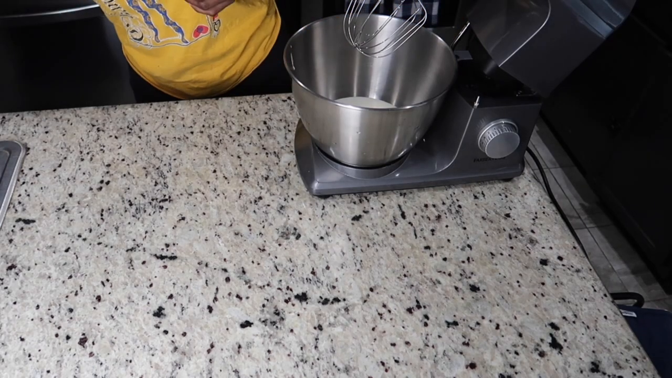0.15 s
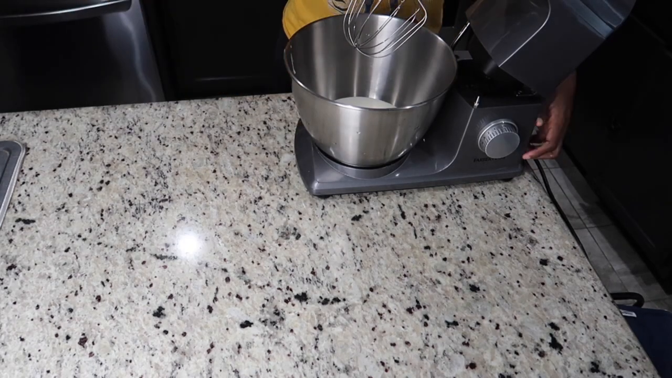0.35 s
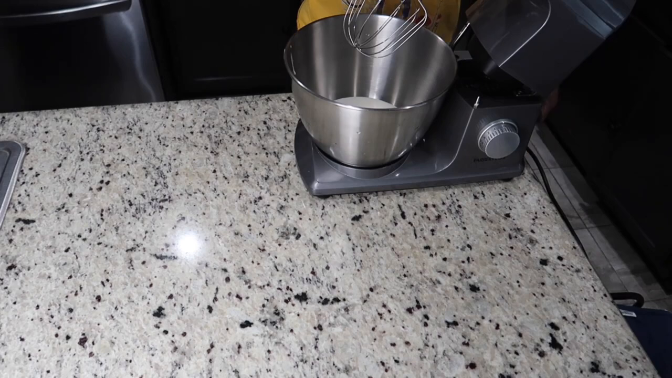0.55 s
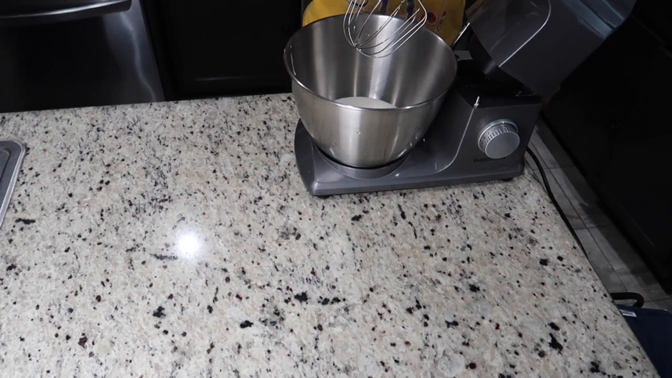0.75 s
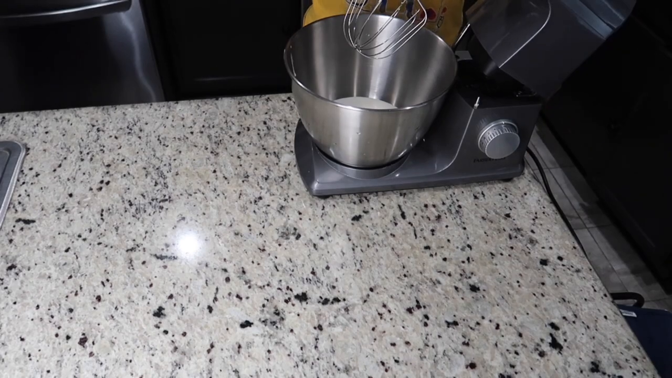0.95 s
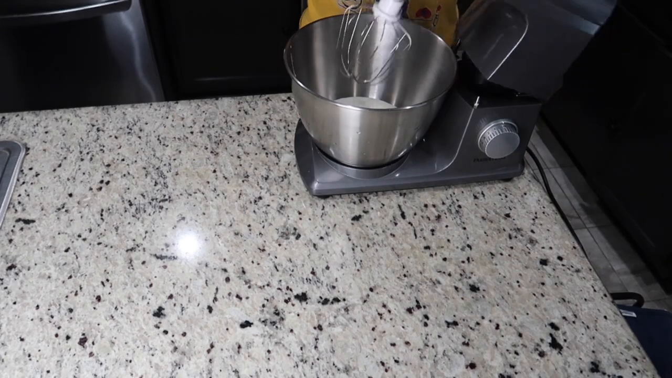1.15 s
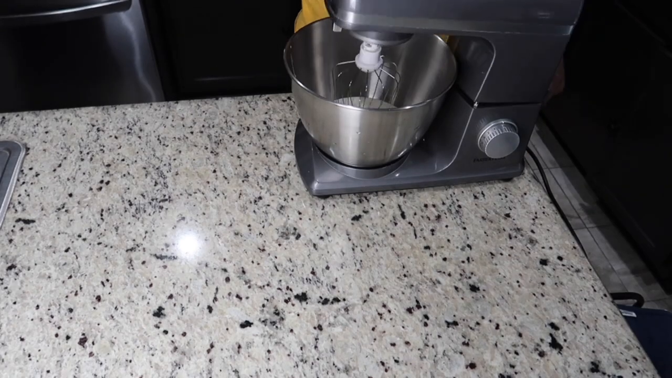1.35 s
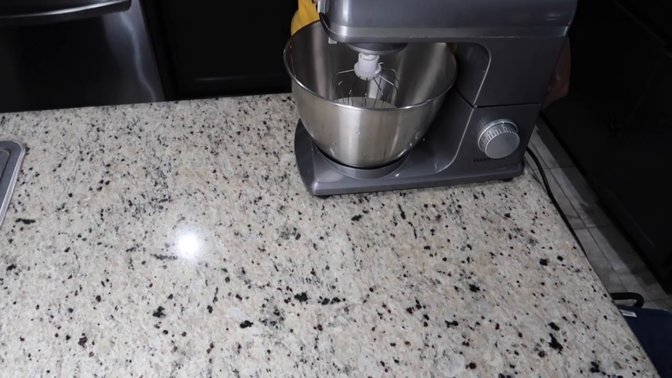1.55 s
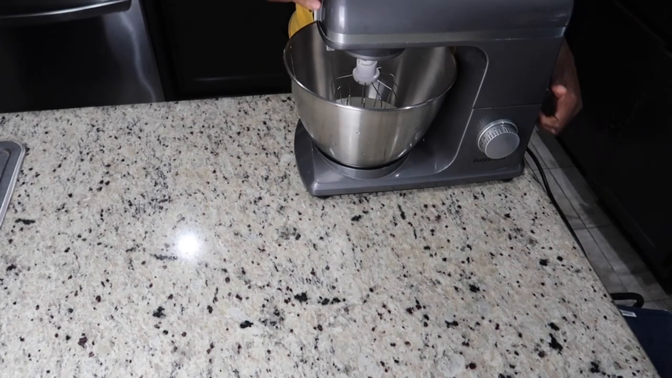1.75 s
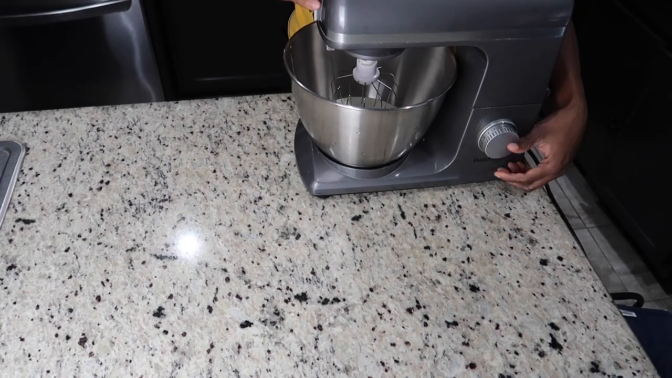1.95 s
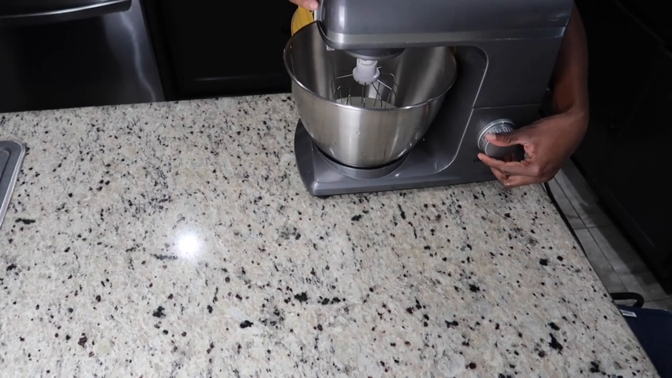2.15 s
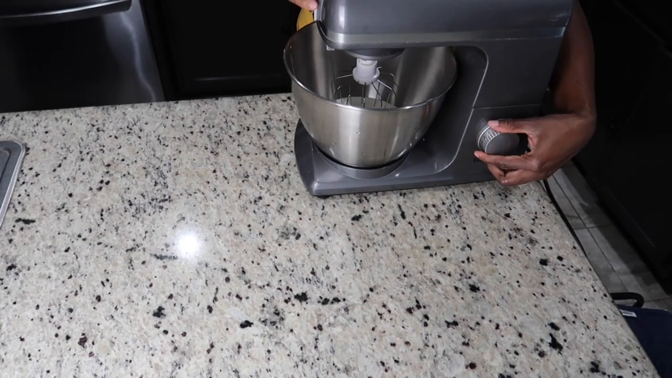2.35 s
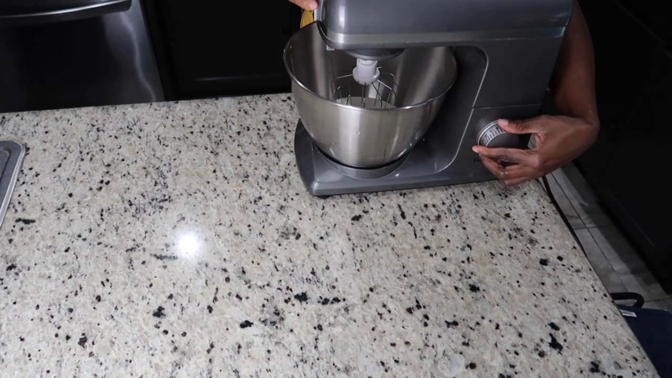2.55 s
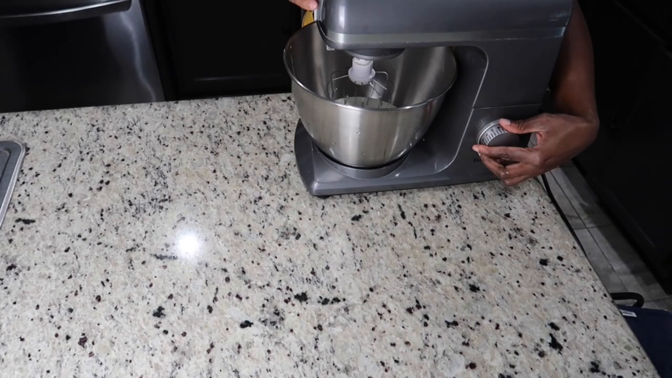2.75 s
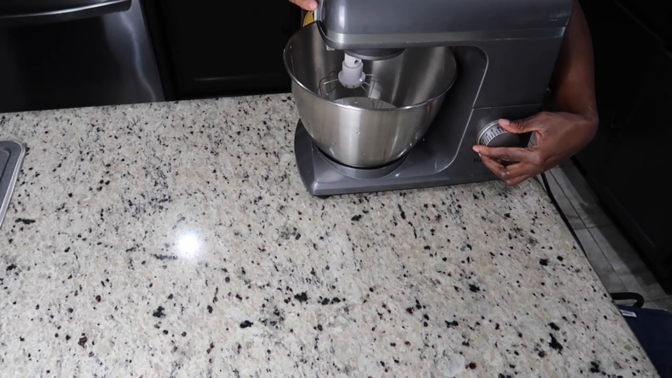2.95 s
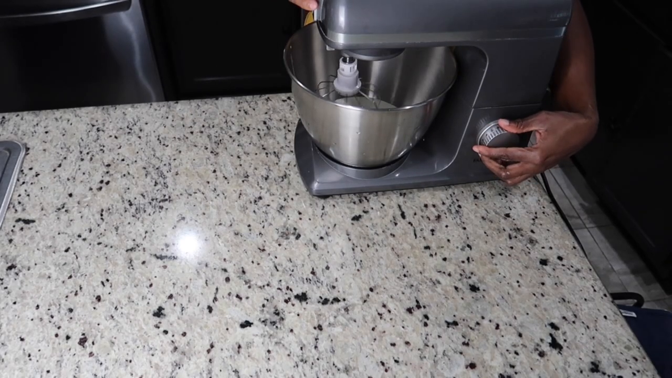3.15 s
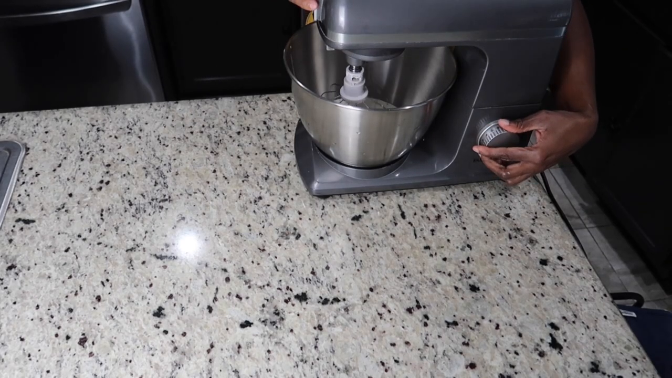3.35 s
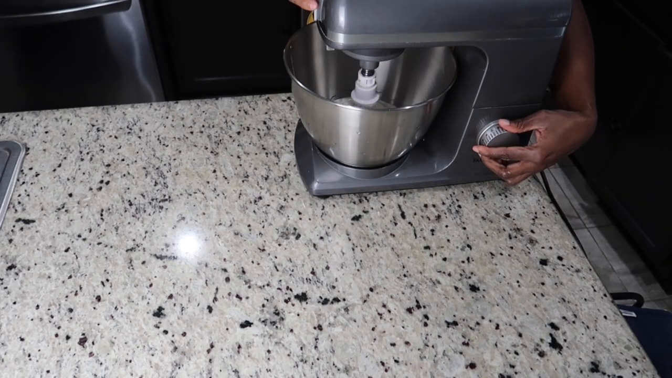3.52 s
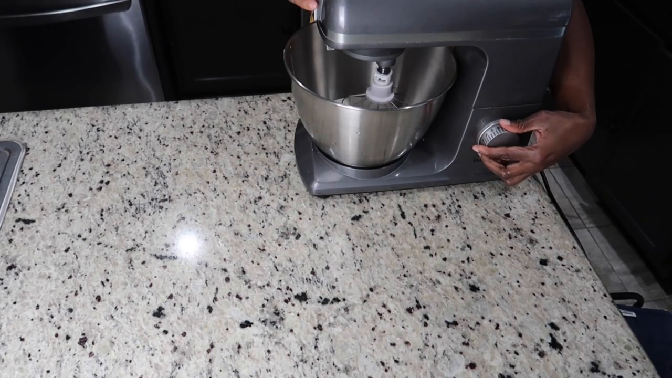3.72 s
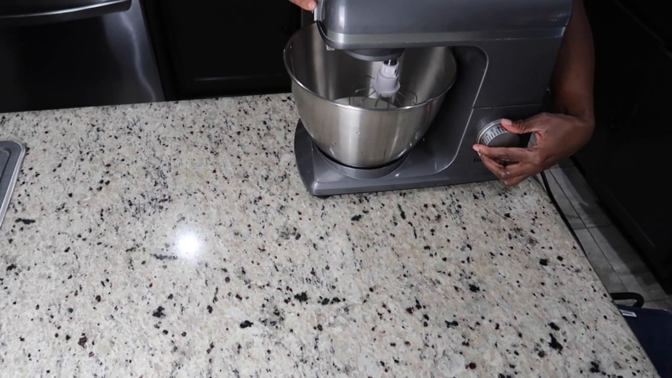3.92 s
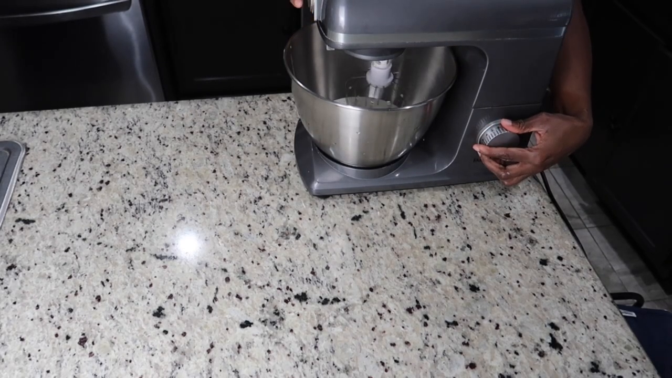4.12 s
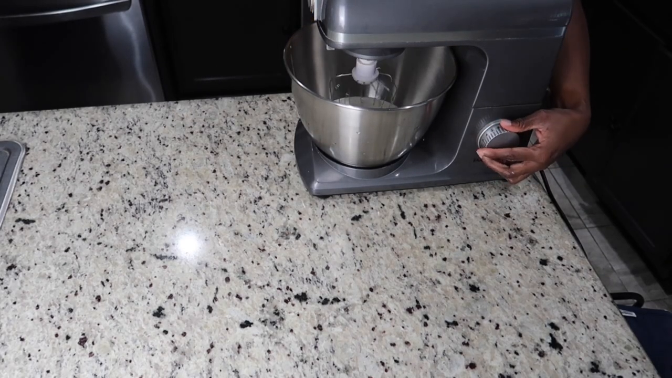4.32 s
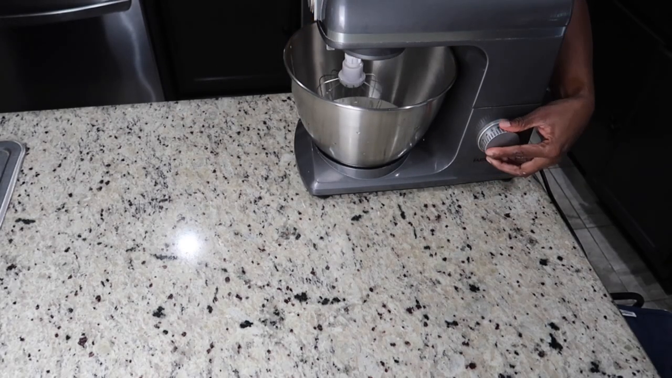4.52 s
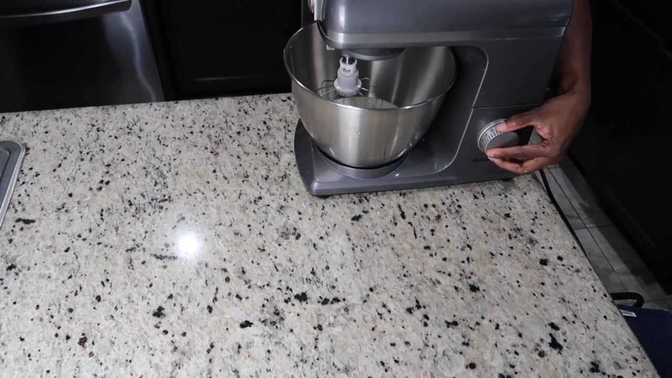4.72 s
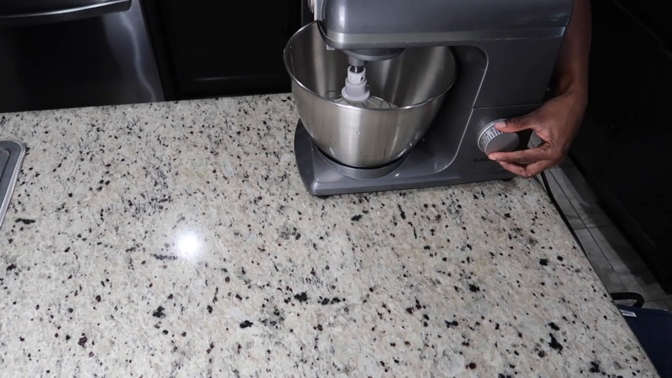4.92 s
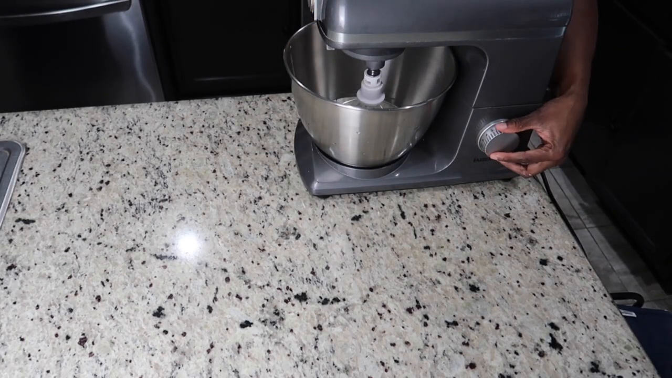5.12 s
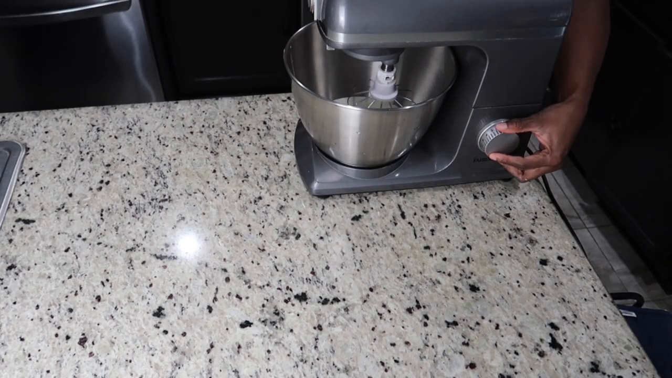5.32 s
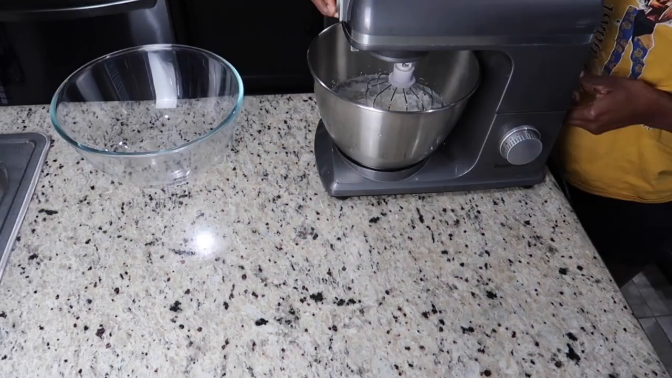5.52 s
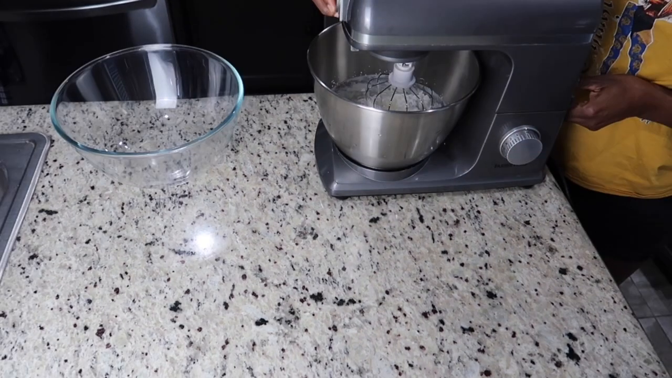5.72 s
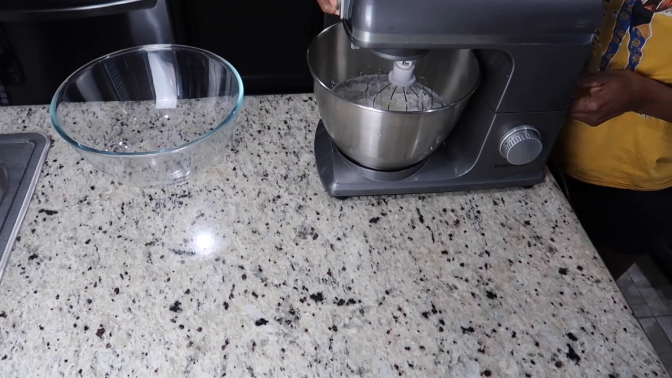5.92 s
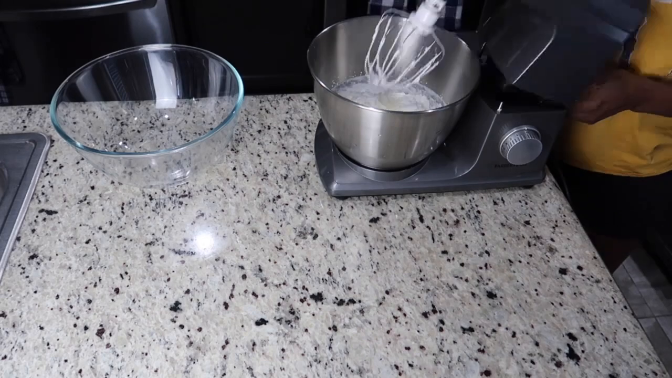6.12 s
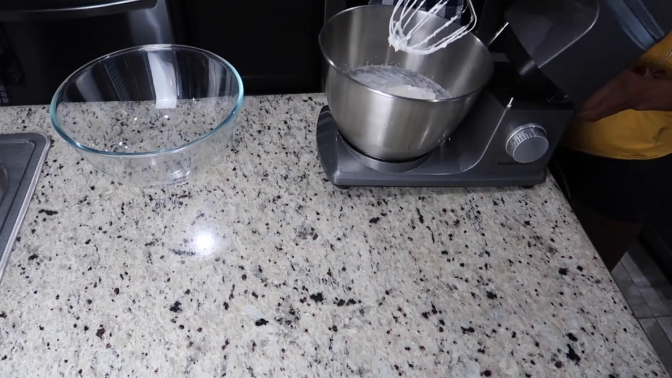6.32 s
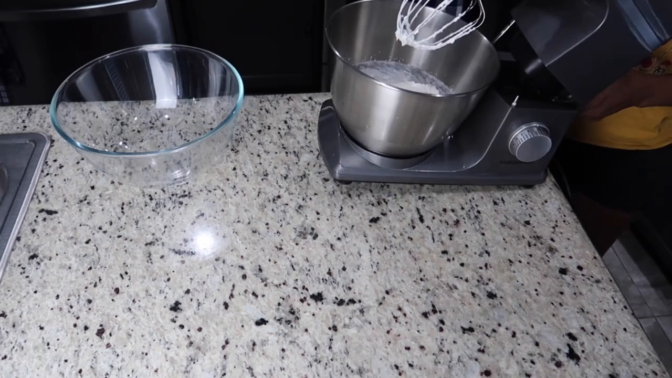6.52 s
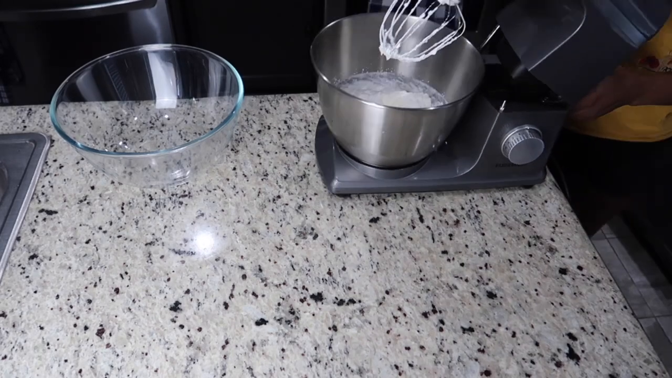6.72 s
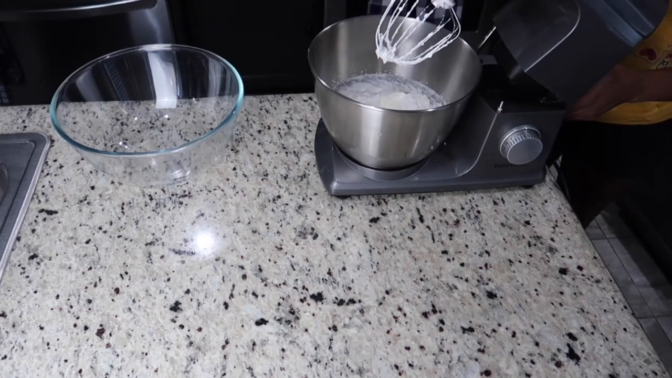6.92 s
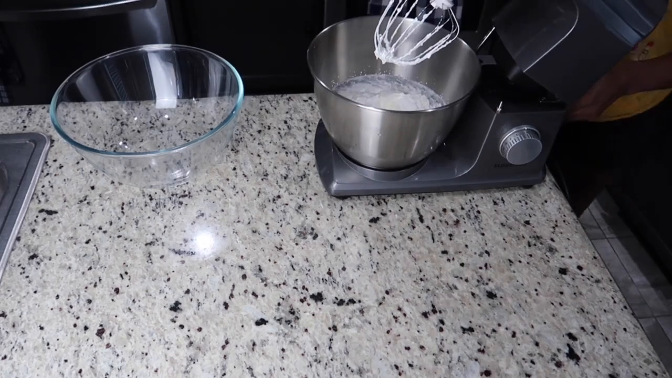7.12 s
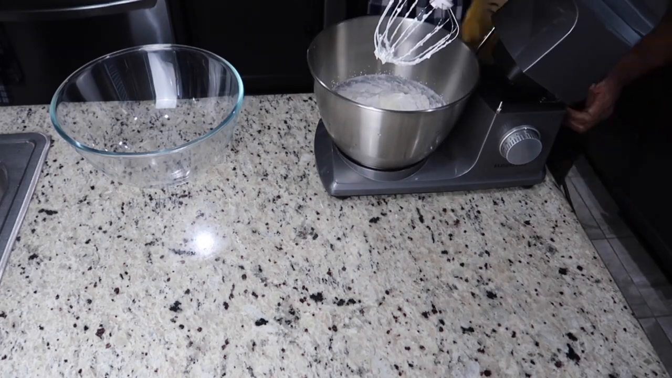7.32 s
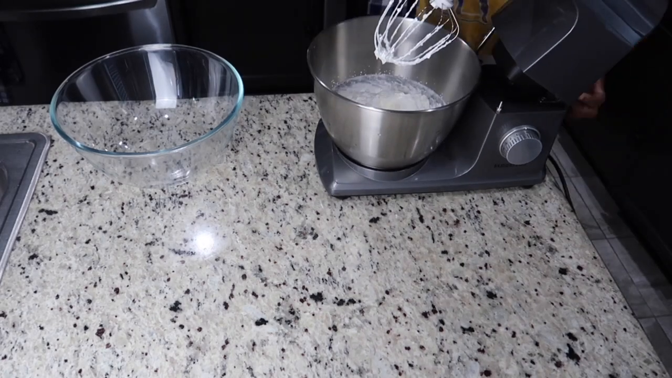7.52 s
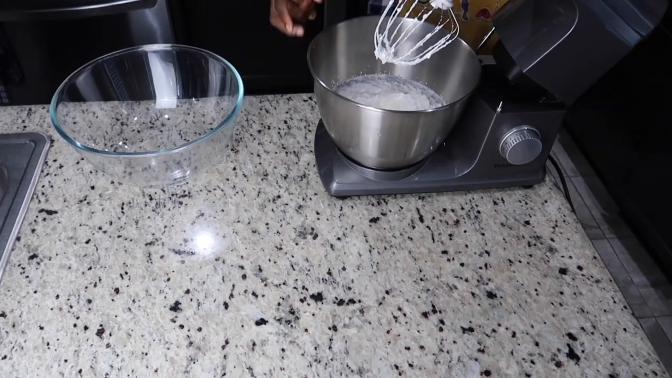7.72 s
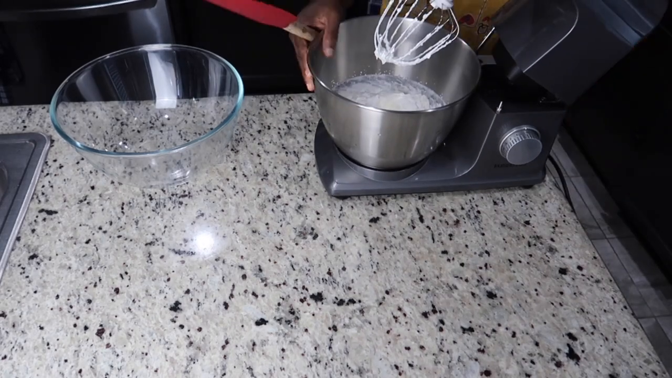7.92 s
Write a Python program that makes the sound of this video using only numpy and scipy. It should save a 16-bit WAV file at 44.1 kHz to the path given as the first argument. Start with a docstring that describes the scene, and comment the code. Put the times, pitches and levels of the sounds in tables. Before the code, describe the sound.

In a small kitchen, a stand mixer clunks shut, whirs with a buzzing gear whine, stops dead, then clatters and squeaks as its head tilts up.

```python
"""A stand mixer on a stone counter in a small kitchen: gear tones follow the shaft, buzz follows the
mains and filtered noise makes the rattle. First its head is unlatched, lowered and locked with clacks
built from bands of noise, ringing modes, dull bumps and gliding squeaks. The dial clicks, the motor runs
up and whisks in a steel bowl until its sound ends abruptly. Then the head is tilted up with clacks and a
scrape of the hinge. Low rumble and faint hiss lie under it all; the handling sounds echo in the room."""
import sys
import numpy as np
from scipy import signal
from scipy.fft import rfft, irfft, next_fast_len
from scipy.io import wavfile
from scipy.ndimage import map_coordinates

SR = 44100
rng = np.random.default_rng(int(sys.argv[2]) if len(sys.argv) > 2 else 0)


def dump(signal):
    """Clip the signal to [-1, 1] and save it as 16-bit WAV at the path in sys.argv[1]."""
    limited = np.clip(np.atleast_2d(signal).T, -1, 1)
    pcm = np.round(limited * 32767).astype(np.int16)
    wavfile.write(sys.argv[1], SR, pcm)


N = 351036
TIME = np.arange(N) / SR


def amp(db):
    """Decibels to gain."""
    return 10 ** (np.asarray(db) / 20)


def unit(x):
    """Scales to rms 1."""
    return x / np.sqrt(np.mean(x ** 2) + 1e-20)


def read(points, hz):
    """Reads a spectrum on a log-frequency axis."""
    f, value = np.transpose(points)
    return np.interp(np.log(hz + 1), np.log(f + 1), value)


def peak_lift(hz, centre_hz, width_hz, lift_db):
    """The lift in dB that one resonance gives at each frequency."""
    return lift_db / (1 + (2 * (hz - centre_hz) / width_hz) ** 2)


def colour(x, points, peaks=()):
    """Filters by a spectrum with resonant lifts."""
    size = next_fast_len(len(x) + 4096)
    hz = np.fft.rfftfreq(size, 1 / SR)
    db = read(points, hz) + sum(peak_lift(hz, *peak) for peak in peaks)
    return irfft(rfft(x, size) * amp(db), size)[:len(x)]


def add(mix, s, sound):
    """Mixes a sound in at a time."""
    part = mix[max(round(s * SR), 0):][:len(sound)]
    part += sound[:len(part)]


def wander(rate_hz):
    """Smooth random movement of rms 1."""
    knots = rng.standard_normal(4000)
    coarse = map_coordinates(knots, [TIME[::16] * rate_hz * 2], order=3, mode="wrap")
    return unit(coarse.repeat(16)[:N])


def hump(s, half_s):
    """A smooth bump of height 1 around a time."""
    return np.exp(-((TIME - s) / half_s) ** 2)


def causal(gain):
    """The most compact impulse response with this gain (minimum phase)."""
    log_gain = np.log(np.maximum(gain, 1e-6))
    circle = np.concatenate([log_gain, log_gain[-2:0:-1]])
    return np.fft.ifft(np.exp(np.conj(signal.hilbert(circle)))).real


def resonate(x, hz, width_hz):
    """A resonance that can follow a pitch curve; steep on both sides."""
    turn = np.exp(2j * np.pi * np.cumsum(hz * np.ones(len(x))) / SR)
    r = np.exp(-np.pi * width_hz / SR)
    return unit((turn * signal.lfilter([1], [1, -2 * r, r * r], x / turn)).real)


# Colour of the kitchen rumble and hiss. Each row: frequency in Hz, gain in dB.
FLOOR_COLOUR = [(15, -57), (25, -22), (53, -19), (71, -12), (93, -5), (167, -17), (278, -17.5),
                (301, -21.5), (335, -18), (673, -28), (729, -28), (790, -31), (1350, -32.5), (10900, -56),
                (15000, -84)]
# Rise and fall of the background. Each row: time in seconds, relative level in dB.
FLOOR_LEVELS = [(0.3, -47), (2.17, -55.5), (2.7, -47.5), (5.5, -45.5), (6.67, -51), (7.96, -48)]


def background(floor_db=3, swell_db=-0.4):
    """Low kitchen rumble and faint hiss: coloured noise with a slow swell and one low resonance."""
    level = np.interp(TIME, *np.transpose(FLOOR_LEVELS))
    noise = colour(rng.standard_normal(N), FLOOR_COLOUR, [(87.5, 22, 5.3)])
    return amp(floor_db + level + swell_db * wander(2.5)) * unit(noise)


# Edges in Hz of the five bands of a blow, from thump to tick.
BLOW_BAND_EDGES = [40, 220, 1020, 2800, 6500, 16000]
# Colour of a blow on the housing. Each row: frequency in Hz, gain in dB.
HOUSING_COLOUR = [(40, -30.5), (85, -4), (140, -11.5), (250, -2.5), (500, 4), (800, -2.5), (950, -1.5),
                  (1150, 2), (2300, 1), (3000, -4.5), (4400, -5.5), (5600, -15), (7000, -23),
                  (11000, -37.5), (16000, -54.5)]


def clack(band_db, rings_hz, lift_db, contact_s, ring_width_hz=270, thump_s=0.027, rattle_s=0.015,
          rattle_db=-8, press_s=0.0019, size=4096):
    """Parts chatter briefly; the heavy base, in the two lowest bands, answers with its own decay."""
    t, hz = np.arange(size) / SR, np.fft.rfftfreq(size, 1 / SR)
    lift = sum(peak_lift(hz, f, ring_width_hz, lift_db) for f in rings_hz)
    body = amp(read(HOUSING_COLOUR, hz) + lift)
    touch = np.exp(-(t / max(contact_s, .001)) ** 2) + amp(rattle_db) * np.exp(-t / rattle_s)
    thump = np.exp(-t / thump_s)
    press = 1 - np.exp(-t / press_s)
    out = np.zeros(size)
    for k, db in enumerate(band_db):
        lo, hi = BLOW_BAND_EDGES[k:k + 2]
        band = 1 / np.sqrt((1 + (lo / (hz + 1)) ** 12) * (1 + (hz / hi) ** 12))
        force = rng.standard_normal(size) * press * (thump if k < 2 else touch)
        out += amp(db) * unit(signal.fftconvolve(force, causal(body * band))[:size])
    return out


# A faint knock at 0.23 s, then clacks of latch, head, dial and bowl. Each row: start in seconds, level in dB, #
# weight of the low knock in dB, brightness in dB, first and second resonance of the struck part in Hz, # their
# lift in dB, contact length in seconds, drive to the ringing frame in dB, send to the room echo in dB.
CLACK_EVENTS = [(0.229, -53.5, -22, -10, 1800, 1150, 14, 0.013, -25, -21),
                (0.695, -27, -14, 2, 1280, 5320, 10.5, 0.012, -7.5, -0.5),
                (0.843, -39.5, -17.5, -7, 2280, 2940, 7.7, 0.0082, -4, 1),
                (0.976, -46, -14, 0.5, 2160, 3524, 5, .006, -11.5, -4),
                (0.982, -21, -16.5, 0.5, 2160, 3530, 6.3, 0.0057, -7, -3),
                (1.274, -55, -3.5, 2, 5200, 6900, 6, .0067, 4.5, -2.5),
                (1.381, -32, -11, -3.5, 1420, 3880, 12, 0.005, -8, -1.5),
                (1.564, -54, -6.5, -2.5, 3600, 2210, 7.9, 0.005, -4, -0.5),
                (1.711, -28, -12, -18, 2320, 1100, 4.9, 0.0055, -7.5, -3.5),
                (1.7166, -22, -4, -5, 2130, 2820, 9.5, 0.0044, -11, -2.5),
                (2.5056, -47.5, -23, -1, 1720, 3190, 19, 0.0043, -18, -5.5),
                (2.653, -48, -7, -10.5, 1300, 2600, 9, 0.0071, -9, 0.5),
                (5.6, -41, -15.5, -4.5, 1080, 3480, 9.4, 0.013, -11.5, -1.5),
                (5.705, -37, -15, 2.5, 2350, 3660, 10, 0.0046, -6, -1),
                (5.779, -46.5, -7.5, 3.5, 2810, 3620, 4.9, 0.0052, -9, 0),
                (5.9495, -40.5, -3.5, -9.5, 1100, 2200, 4, 0.0036, -13.5, -3.5),
                (5.9544, -25.5, -2.5, 1, 2250, 1080, 9.6, 0.0065, -16, -1.5),
                (6.134, -29.5, -27.5, -3, 1330, 3600, 11, 0.0021, -19.5, -3),
                (6.181, -44, -24, -12, 2526, 1400, 10, 0.004, -16, -4),
                (6.223, -38, -13.5, -11, 1900, 3700, 7.3, 0.0036, -8.5, 6.5),
                (6.2585, -28.5, -7, -0.5, 1690, 3580, 5, 0.0023, -14, -2.5),
                (6.263, -25, -3.5, -10, 2230, 1500, 4.1, 0.023, -14, 1),
                (6.285, -31.5, -2, -2.5, 1930, 1610, 2.8, 0.017, -24, 0),
                (6.638, -61.5, -12, -9, 2300, 3600, 5, 0.008, -15, -4),
                (6.8122, -24.5, -9, -1, 2050, 3640, 6.2, 0.0047, -14.5, -1.5),
                (7.055, -57.5, -15, -4, 3500, 2100, 6, 0.0048, -5.5, 2.5),
                (7.306, -60, -8.5, -8, 2190, 1150, 6.4, 0.0052, -8.5, 10.5)]
# Ringing of housing, whisk and bowl. Each row: frequency in Hz, level in dB before
# long rings are evened out, time to fall 60 dB in seconds.
RING_MODES = [(301, 7, 0.41), (499, -1, 0.4), (598, -11.5, 0.44), (828, -5, 0.4), (1125, -0.5, 0.27),
              (1266, -2, 0.2), (1382, -6.5, 0.13), (1846, -8.5, 0.22), (2800, -18.5, .22),
              (3560, -12.5, 0.18), (3760, -14.5, 0.25), (4600, -12, 0.3), (5400, 1, 0.25),
              (6078, -5.5, .15), (11500, 2.5, 0.11)]
THUMP_DB, THUMP_PER_WEIGHT = -4.5, 2  # heavy blows reach the deepest band
TICK_DB, TICK_PER_BRIGHT = -18, 2.72  # hard blows reach the highest band


def handling(ring_db=-52, echo_colour=0.79, echo_smear=1.0):
    """Clacks set metal modes ringing; the sound sent to the room has evener struck-part resonances."""
    blows, shaken, thrown = np.zeros((3, N))
    for (s, db, weight_db, bright_db, first_hz, second_hz, lift_db, contact_s,
         frame_db, room_db) in CLACK_EVENTS:
        thump_db = THUMP_DB + THUMP_PER_WEIGHT * weight_db
        tick_db = TICK_DB + TICK_PER_BRIGHT * bright_db
        band_db = db + np.array([thump_db, weight_db, 0, bright_db, tick_db])
        rings_hz = first_hz, second_hz
        blow = clack(band_db, rings_hz, lift_db, contact_s)
        echoed = clack(band_db, rings_hz, lift_db * echo_colour, contact_s * echo_smear)
        add(blows, s, blow)
        add(shaken, s, amp(frame_db) * blow)
        add(thrown, s, amp(room_db) * echoed)
    t = np.arange(SR // 2) / SR
    modes = sum(amp(db - 60 * t / t60) * np.sin(2 * np.pi * hz * t) / np.sqrt(t60)
                for hz, db, t60 in RING_MODES)
    ringing = amp(ring_db) * signal.fftconvolve(shaken, modes)[:N]
    return blows + ringing, thrown + ringing


# Dull low bumps. Each row: start in seconds, level in dB, pitch in Hz,
# decay in seconds, gain of the noise puff in dB.
BUMP_EVENTS = [(0.2301, -17, 182, 0.021, -10), (0.232, -26, 305, 0.025, -1), (1.675, -39, 96.3, 0.041, -11),
               (1.686, -46, 300, 0.03, 7.5), (1.721, -17.5, 301, 0.045, -14),
               (1.729, -29.5, 77.9, 0.035, -12), (5.958, -30, 80.1, 0.043, -16),
               (6.258, -18.5, 178, 0.022, 1), (6.802, -23.5, 76, 0.021, -17), (6.807, -19.5, 162, 0.02, -9),
               (7.357, -38.5, 220, 0.017, -3.5)]
# Colour of the puff. Each row: frequency in Hz, gain in dB.
PUFF_COLOUR = [(80, -20.5), (200, 2.5), (350, 0.5), (600, -5.5), (800, -13), (1850, -20), (2600, -29.5),
               (12000, -63)]


def bumps(size=16000, rise_s=0.003, choke=1.5):
    """Soft low knocks, a sine with a puff of noise, that die almost at once."""
    out, t = np.zeros(N), np.arange(size) / SR
    for s, db, hz, decay_s, puff_db in BUMP_EVENTS:
        puff = amp(puff_db) * unit(colour(rng.standard_normal(size), PUFF_COLOUR))
        tone = np.sin(2 * np.pi * hz * t)
        shape = np.exp(-(t / decay_s) ** choke) * np.minimum(t / rise_s, 1)
        add(out, s, amp(db) * (puff - tone) * shape)
    return out


# Rubbing strokes of hinge and hands. Each row: start in seconds, length in seconds, level at the peak
# in dB, place of the peak in the stroke from 0 to 1, pitch the squeak glides from in Hz, pitch it glides
# towards in Hz, squeak's width in Hz, squeak over scrape in dB.
RUB_STROKES = [(0.417, 0.47, -53, 0.24, 2250, 2200, 700, -13), (1.163, 0.15, -35, 0.41, 2040, 1800, 897, 7),
               (1.285, 0.12, -43.5, 0.25, 3850, 3800, 200, -1.5),
               (2.413, 0.56, -53, 0.17, 2390, 2510, 700, 3),
               (6.138, 0.024, -23.5, 0.55, 1290, 1280, 130, 11),
               (6.14, 0.12, -25.5, 0.3, 1250, 3520, 560, 2), (6.633, 0.22, -47, 0.15, 2400, 2120, 700, -17),
               (7.428, 0.11, -49, 0.25, 2470, 2300, 700, -23),
               (7.685, 0.38, -41.5, 0.76, 1950, 1890, 700, -6)]
# Colour of scrape and squeak. Each row: frequency in Hz, gain in dB.
RUB_TONE = [(100, -32), (830, -5.5), (1200, -0.5), (2300, -0.5), (3900, -5.5), (5000, -12), (8000, -26),
            (15000, -59)]
RUB_RISE_DB, RUB_FALL_DB = 19, 10  # a stroke swells to its peak and eases off
SWING_AT, SWING_SHARE = .39, 0.19  # place in the stroke where the hinge swings fastest, spread around it


def rubbing(stutter=0.43, grain_db=2, fade_s=0.0027):
    """Grainy sliding friction with a squeak that glides as the hinge turns."""
    out = np.zeros(N)
    grip, catch = amp(grain_db * wander(130)), wander(90)
    for start, length, db, peak, first_hz, last_hz, width_hz, squeak_db in RUB_STROKES:
        t = np.arange(0, length, 1 / SR)
        place = t / length
        swell_db = np.interp(place, [0, np.clip(peak, .01, .99), 1], [-RUB_RISE_DB, 0, -RUB_FALL_DB])
        turned = (1 + np.tanh((place - SWING_AT) / SWING_SHARE)) / 2
        hz = first_hz + (last_hz - first_hz) * turned
        # the pitch jumps as the surfaces stick and slip
        hz = hz + stutter * width_hz * np.interp(start + t, TIME, catch)
        slips = rng.standard_normal(len(t)) * np.interp(start + t, TIME, grip)
        scrape = unit(colour(slips, RUB_TONE))
        # the squeak is driven by the same noise, reversed in time
        squeak = amp(squeak_db) * unit(colour(resonate(slips[::-1], hz, width_hz), RUB_TONE))
        fade = np.clip(np.minimum(t, length - t) / fade_s, 0, 1)
        add(out, start, amp(db + swell_db) * fade * (scrape + squeak) / np.hypot(1, amp(squeak_db)))
    return out


# Lurches of the motor under the whisk's uneven load. Each row: time in seconds, rise of the mesh pitch
# in Hz, dip of the whine in dB (negative lifts it), swell of the buzz in dB (negative dips it).
LOAD_LURCHES = [(3.19, 10, -6, 1), (3.9, 13.5, -0.5, -1), (4.44, 10, 4.5, 4), (4.81, 15, 2.5, 5.5),
                (5.02, 0, 1.5, 3.5), (5.3, 12, 6.5, 4)]
MOTOR_ON, MOTOR_SOUND_END = 2.635, 5.55  # s
FULL_MESH_HZ = 1093  # gear mesh pitch at full speed under even load
RUN_UP_S, FIRST_SPEED, EASE = .66, .18, 1.7  # soft start: length, first share of full speed, levelling out
WHINE_DB, BUZZ_DB = -26, -35  # levels under even load
SLACK_S, LURCH_S = 0.027, .09  # half lengths of the teeth running slack and of the speed rise
PULL_LAG_S, PULL_S = 0.11, 0.068  # the motor answers a little later: delay and half length


def drive():
    """The motor eases up to speed; lurches under load shift its pitch, whine and buzz."""
    run_up = np.clip((TIME - MOTOR_ON) / RUN_UP_S, 0, 1)
    speed = 1 - (1 - FIRST_SPEED) * (1 - run_up) ** EASE
    mesh_hz = FULL_MESH_HZ * speed
    whine_db, buzz_db = np.full(N, float(WHINE_DB)), np.full(N, float(BUZZ_DB))
    for s, rise_hz, dip_db, swell_db in LOAD_LURCHES:
        mesh_hz += rise_hz * hump(s + SLACK_S, LURCH_S)
        whine_db -= dip_db * hump(s, SLACK_S)
        buzz_db += swell_db * hump(s + PULL_LAG_S, PULL_S)
    return speed, mesh_hz, whine_db, buzz_db


# Gear tones. Each row: multiple of shaft speed, relative level in dB.
GEAR_TONES = [(11, -26), (21, -16), (22, 0.5), (23, -5.5), (24, -19.5), (32, -14), (33, -8), (34, -14.5),
              (39, -15.5), (41, -14.5), (55, -15.5), (56, -22.5)]
# Buzz of the chopped mains. Each row: multiple of mains frequency, relative level in dB when running,
# relative level in dB towards standstill.
BUZZ_LINES = [(4, -13.5, -14.5), (6, -2, -13), (8, 0, -3.5), (10, -7, -12), (18, -3.5, -19.5),
              (19, -12, -22), (32, -18.5, -15), (34, -17.5, -20)]
# Broad colour of the gearbox noise. Each row: frequency in Hz, gain in dB.
GEAR_COLOUR = [(60, -30.5), (170, -8), (280, 0.5), (540, 1.5), (680, -2), (950, -1.5), (1400, 0), (2200, 2),
               (3100, -7), (4000, -11.5), (5500, -18.5), (7500, -30.5), (10500, -49.5), (15000, -65)]
# Casing resonances. Each row: frequency in Hz, width in Hz, lift in dB.
CASING_PEAKS = [(304, 25, 9), (493, 24, 7.5), (560, 45, 4.6), (1128, 140, 11.4), (1712, 107, 8),
                (1890, 530, 3.5), (2780, 240, 7.9), (3227, 61, 9.8), (3750, 410, 4), (4600, 61, 2.3)]
# Howls of the casing as the motor pulls up through its resonances. Each row: centre in seconds,
# half length in seconds, pitch in Hz, width in Hz, level in dB.
CASING_HOWLS = [(2.765, .045, 1920, 170, -36.5), (3.01, 0.2, 1954, 170, -32.5),
                (3.04, 0.078, 488, 32, -31.5), (3.083, 0.39, 1123, 90, -36.5)]
MESH_ORDER, MAINS_HZ = 22, 60  # gear mesh cycles per shaft turn, mains frequency
GEAR_DB, GEAR_RISE_S = -28.5, 0.23  # gear rattle and the time it takes to build
WHINE_ON, WHINE_RISE_S = 3.24, .06  # the gears begin to sing as the motor reaches full speed


def motor(jitter=0.0019, side_flutter=0.56, rattle_db=1.2, beat=0.11, buzz_flutter=0.27,
          whine_flutter_db=1.27, catch_s=0.14):
    """Gear tones on the shaft speed, buzz locked to the mains, and rattle that throbs with the torque."""
    speed, mesh_hz, whine_db, buzz_db = drive()
    shaft = 2 * np.pi * np.cumsum(mesh_hz * (1 + jitter * wander(25))) / MESH_ORDER / SR
    mains = 2 * np.pi * MAINS_HZ * TIME
    whine, buzz = np.zeros(N), np.zeros(N)
    for k, db in GEAR_TONES:
        # play between the teeth shakes each tone in strength and phase; the mesh tone is the steadiest
        shake = .13 if round(k) == MESH_ORDER else side_flutter
        phasor = np.exp(1j * (round(k) * shaft + rng.uniform(0, 2 * np.pi)))
        whine += amp(db) * unit((phasor * (1 + shake * (wander(22) + 1j * wander(22)))).real)
    for k, running_db, starting_db in BUZZ_LINES:
        db = starting_db + (running_db - starting_db) * speed ** 3
        # the load shifts each line in strength and phase
        waver = 1 + buzz_flutter * (wander(6) + 1j * wander(6))
        phasor = np.exp(1j * (round(k) * mains + rng.uniform(0, 2 * np.pi)))
        buzz += amp(db) * (waver * phasor).real
    throb = (1 + beat * np.cos(2 * mains)) * amp(rattle_db * wander(70))
    since_on = np.maximum(TIME - MOTOR_ON, 0)
    caught = np.minimum(since_on / catch_s, 1)  # the buzz comes first, then the gears begin to turn
    build = 1 - np.exp(-since_on / GEAR_RISE_S)
    gear_noise = unit(colour(rng.standard_normal(N) * throb, GEAR_COLOUR, CASING_PEAKS))
    rattle = amp(GEAR_DB) * build * gear_noise
    howl = sum(amp(db) * hump(s, half_s) * resonate(rng.standard_normal(N) * throb, hz, width_hz)
               for s, half_s, hz, width_hz, db in CASING_HOWLS)
    whine_in = (1 + np.tanh((TIME - WHINE_ON) / WHINE_RISE_S)) / 2
    singing = amp(whine_db + whine_flutter_db * wander(16)) * whine_in * unit(whine)
    sound = caught * (rattle + howl) + singing + amp(buzz_db) * unit(buzz)
    return sound * np.minimum(since_on / 0.04, 1) * np.clip((MOTOR_SOUND_END - TIME) / 0.035, 0, 1)


# Echo length of the kitchen. Each row: frequency in Hz, time to fall 60 dB in seconds.
ROOM_DECAY = [(100, 0.22), (400, 0.61), (1500, 0.52), (4000, 0.42), (8000, 0.62), (15000, 0.29)]


def room(x, build_s=0.00055):
    """Diffuse kitchen echo: sparse taps, each band dying at its own speed."""
    taps = rng.choice([-1., 1.], SR) * (rng.random(SR) < .1)
    hz, t, z = signal.stft(taps, SR, nperseg=256)
    z = z * amp(-60 * t / read(ROOM_DECAY, hz)[:, None]) * (1 - np.exp(-t / build_s))
    tail = signal.istft(z, SR, nperseg=256)[1]
    return signal.fftconvolve(x, tail / np.linalg.norm(tail))[:N]


def scattered(x, size=1200):
    """Near reflections from counter and cupboards, different at each port."""
    taps = rng.standard_normal(size) * np.linspace(1, 0, size) ** 2
    return signal.fftconvolve(x, taps / np.linalg.norm(taps))[:N]


# Stereo width of mixer and echo. Each row: frequency in Hz, gain of the side signal in dB.
MIXER_WIDTH = [(100, -37.5), (1000, -29), (2200, -16.5), (4000, -11.5), (5600, -2), (8000, 7),
               (14000, 15.5)]
# Stereo width of the background. Each row: frequency in Hz, side over mid in dB.
FLOOR_WIDTH = [(60, -42), (180, -9.5), (550, -5), (1650, -2.5), (4970, -1), (15000, 6)]
CHANNEL_DB = .2  # mid is lowered by this in the first channel and raised in the second


def scene(wet_db=-8, rub_wet_db=-8):
    """The mixer is near the centre; its treble reaches two microphone ports out of step, its echo all round."""
    (blows, thrown), rubs = handling(), rubbing()
    direct = blows + rubs + bumps() + motor()
    sent = amp(wet_db) * thrown + amp(rub_wet_db) * rubs
    out_of_step = signal.hilbert(direct, next_fast_len(N)).imag[:N]  # a quarter cycle late
    side = colour(out_of_step + room(sent), MIXER_WIDTH)
    diffuse = .4 * np.array([scattered(side), scattered(side)])
    mid = direct + room(sent) + background()
    side = side + colour(background(), FLOOR_WIDTH)
    return np.array([amp(-CHANNEL_DB) * mid + side, amp(CHANNEL_DB) * mid - side]) + diffuse


EDGE_HZ = 15800  # upper band limit


def record(dry):
    """Soft overload on the loudest peaks, then the band limit."""
    held = dry / (1 + dry ** 6) ** (1 / 6)
    low_pass = signal.firwin(511, EDGE_HZ, window=("kaiser", 9), fs=SR)
    return signal.oaconvolve(held, low_pass[None], "same")


dry = scene()
out = record(dry)
dump(out)
```